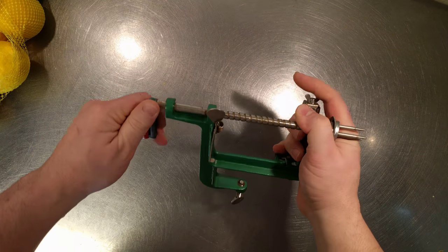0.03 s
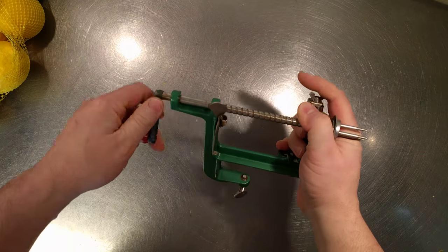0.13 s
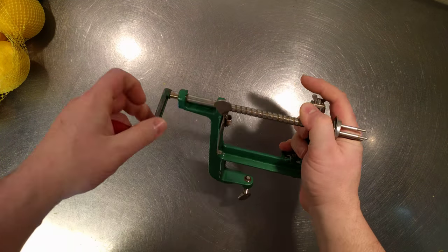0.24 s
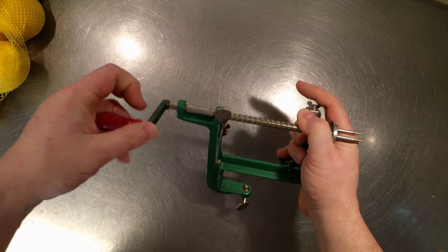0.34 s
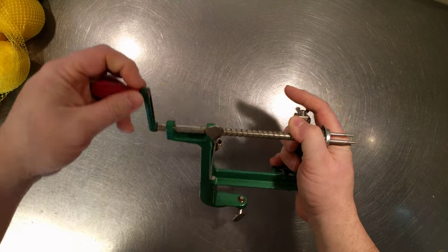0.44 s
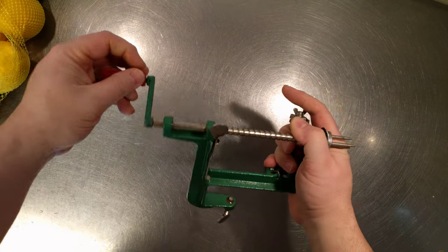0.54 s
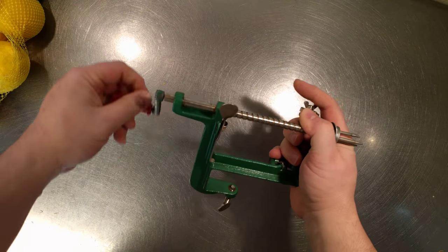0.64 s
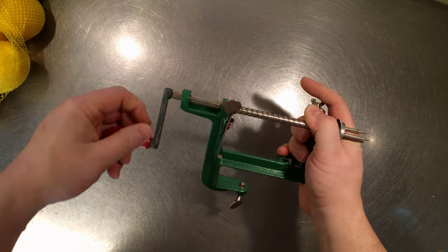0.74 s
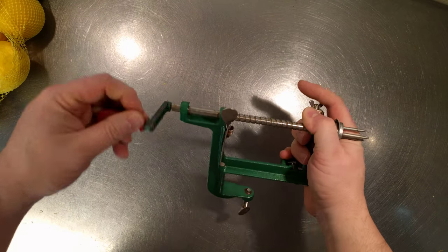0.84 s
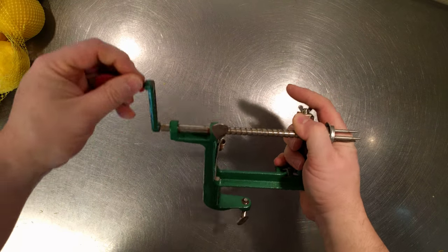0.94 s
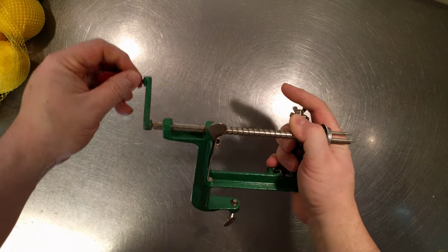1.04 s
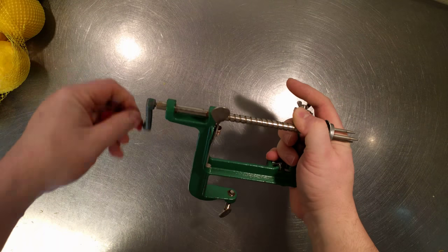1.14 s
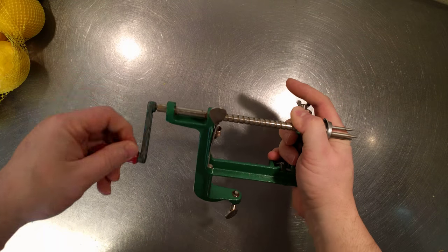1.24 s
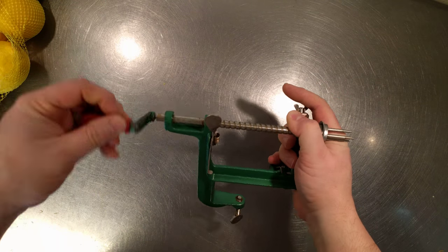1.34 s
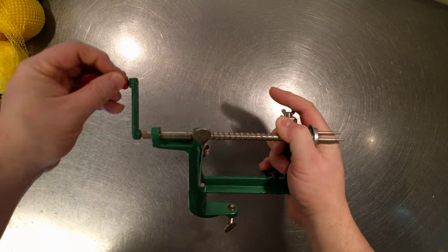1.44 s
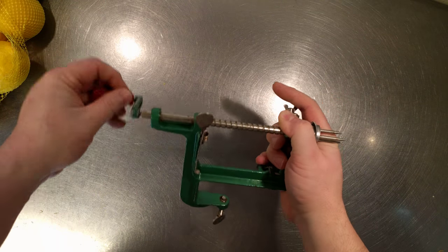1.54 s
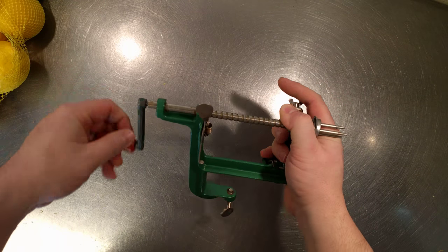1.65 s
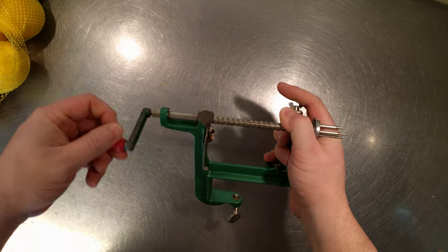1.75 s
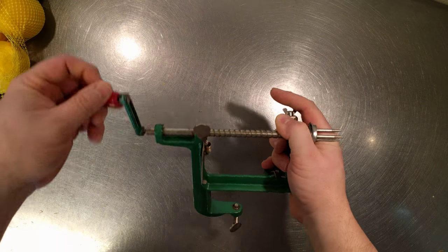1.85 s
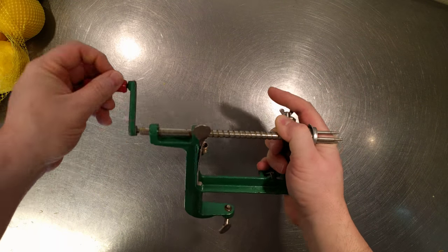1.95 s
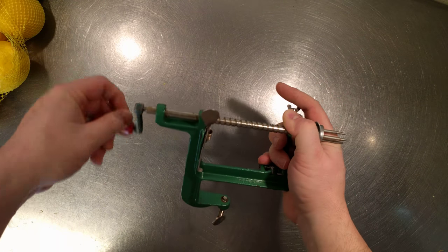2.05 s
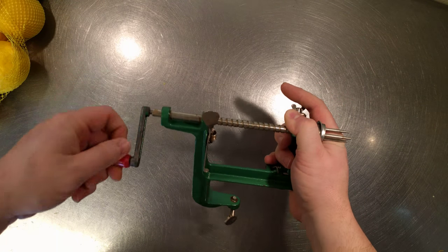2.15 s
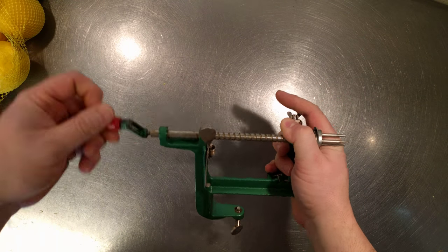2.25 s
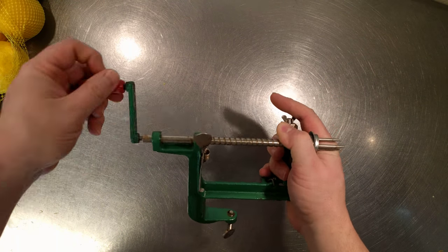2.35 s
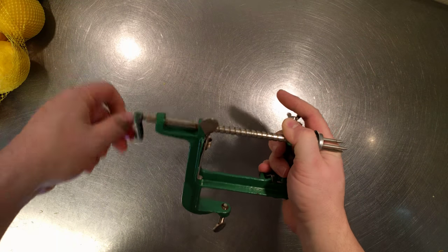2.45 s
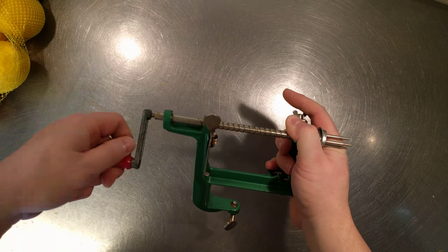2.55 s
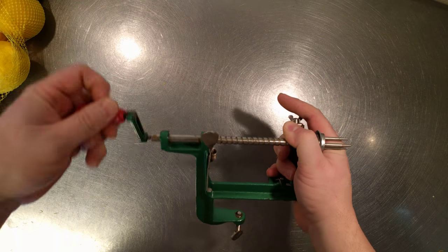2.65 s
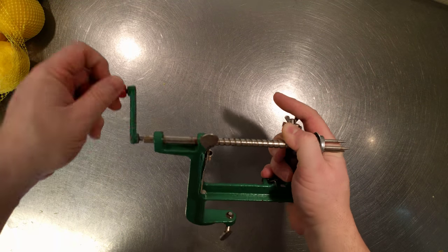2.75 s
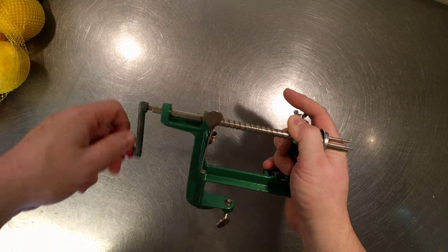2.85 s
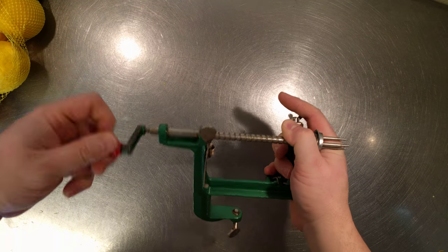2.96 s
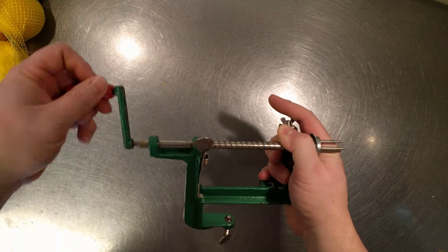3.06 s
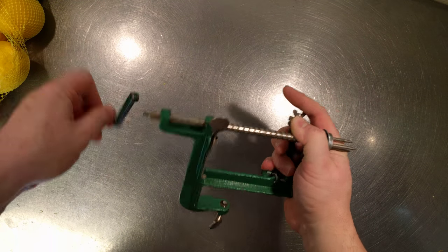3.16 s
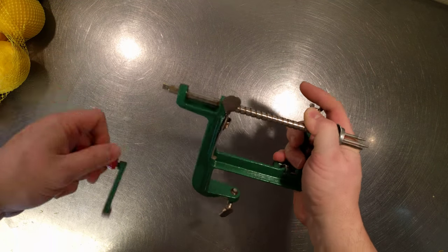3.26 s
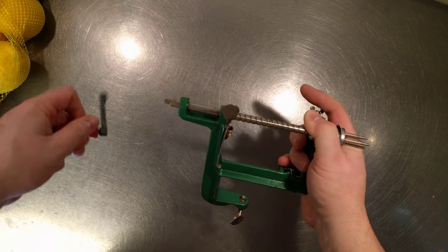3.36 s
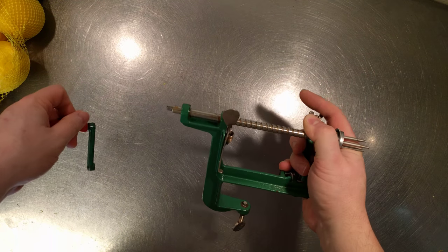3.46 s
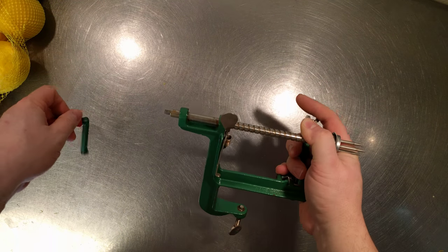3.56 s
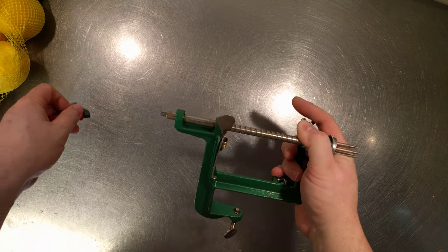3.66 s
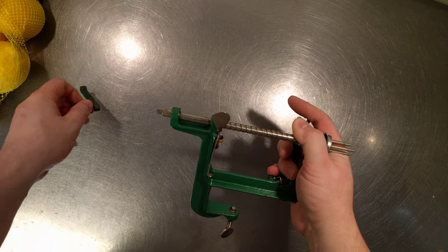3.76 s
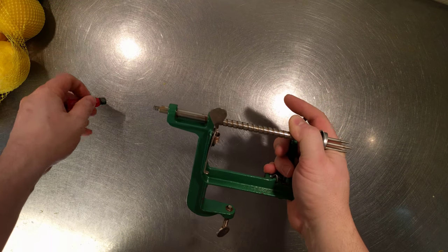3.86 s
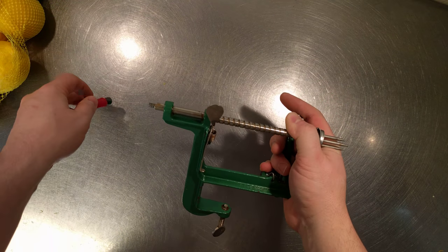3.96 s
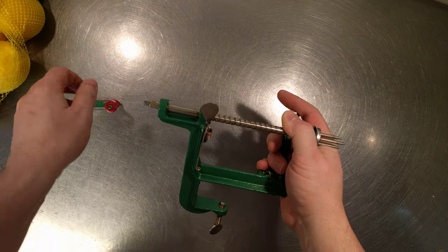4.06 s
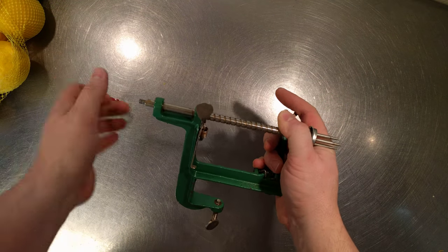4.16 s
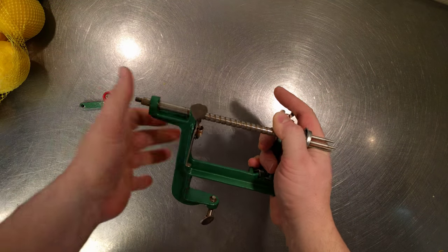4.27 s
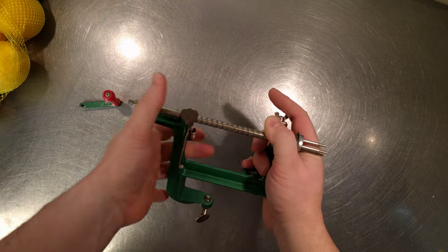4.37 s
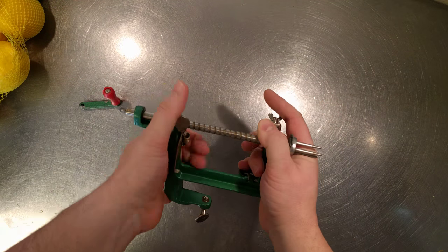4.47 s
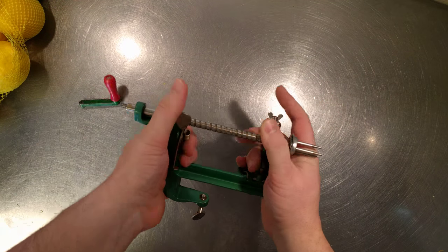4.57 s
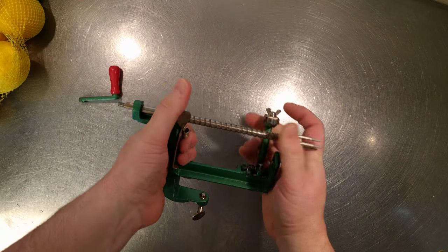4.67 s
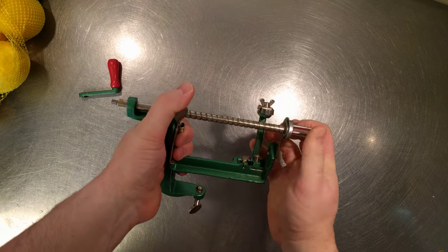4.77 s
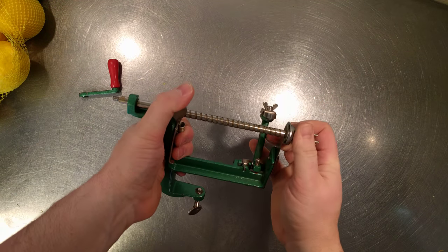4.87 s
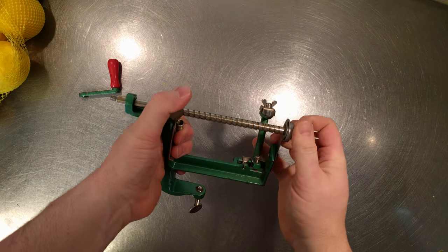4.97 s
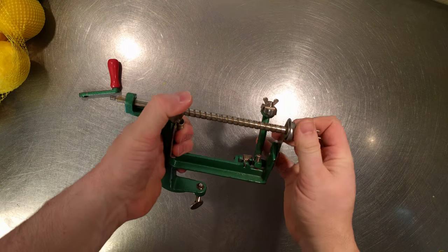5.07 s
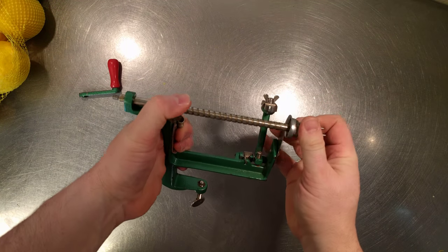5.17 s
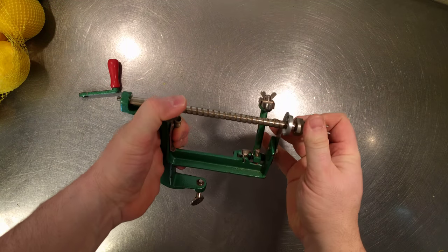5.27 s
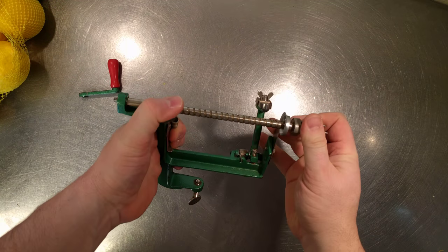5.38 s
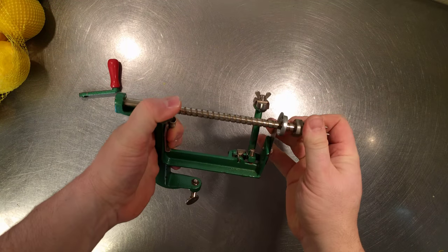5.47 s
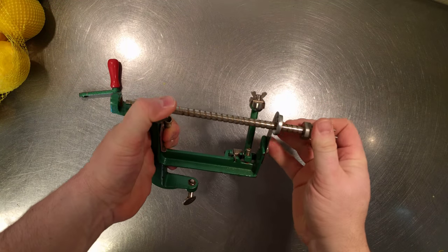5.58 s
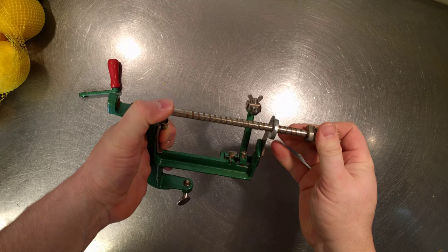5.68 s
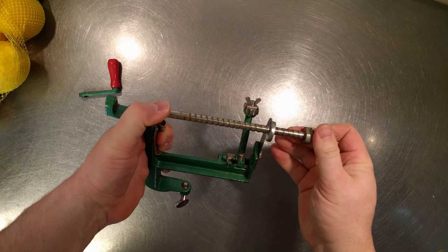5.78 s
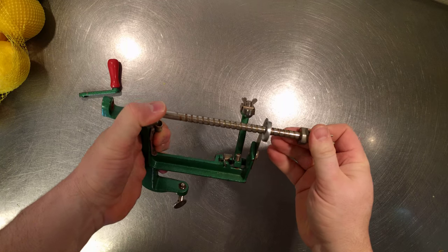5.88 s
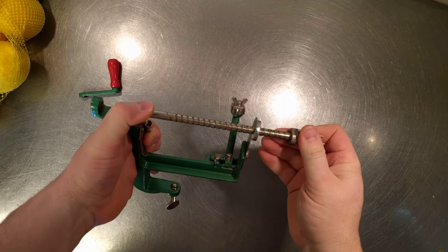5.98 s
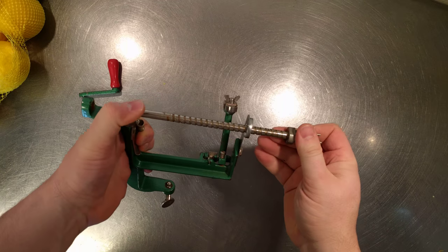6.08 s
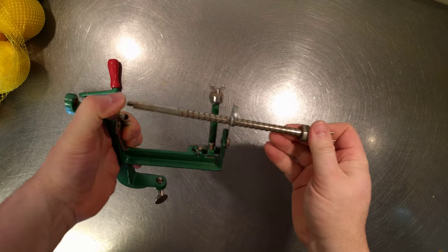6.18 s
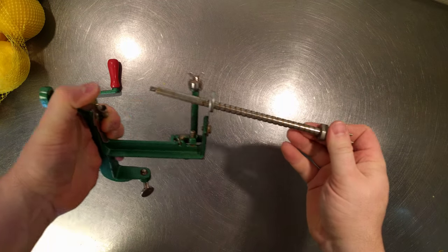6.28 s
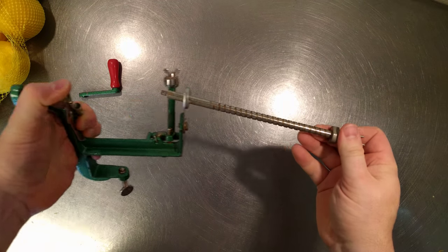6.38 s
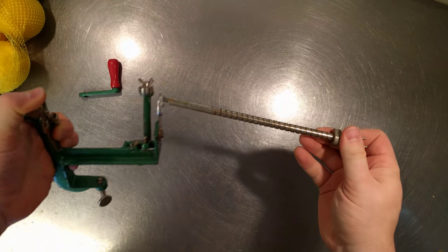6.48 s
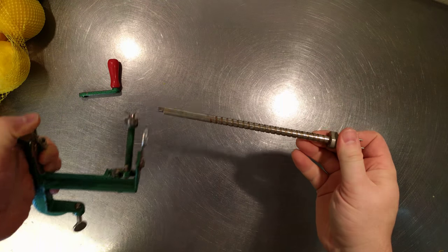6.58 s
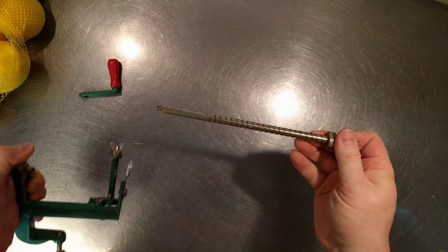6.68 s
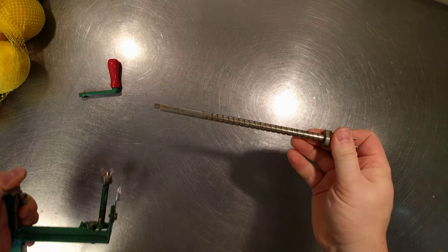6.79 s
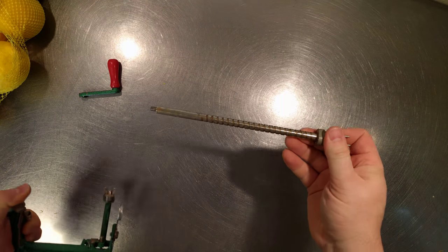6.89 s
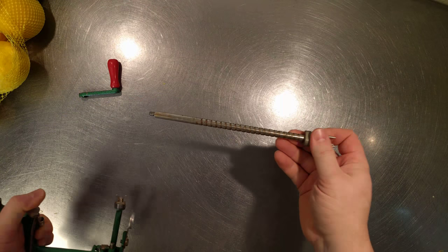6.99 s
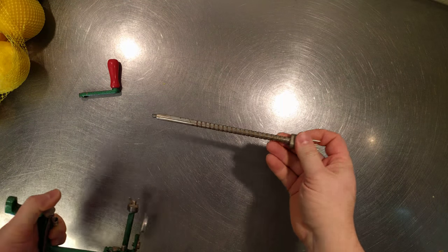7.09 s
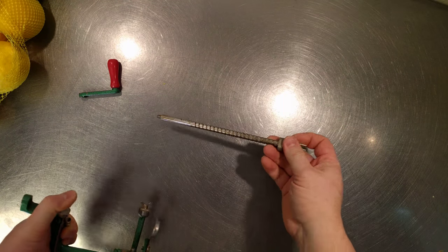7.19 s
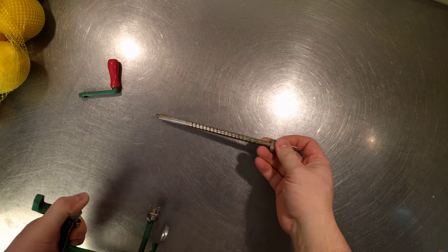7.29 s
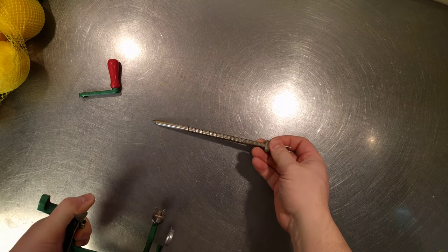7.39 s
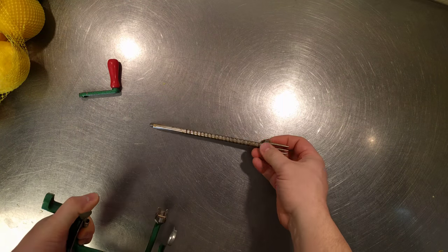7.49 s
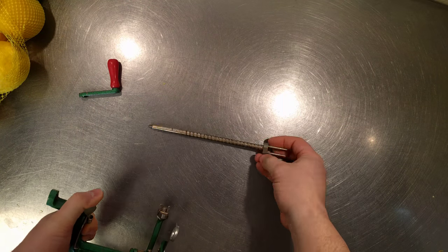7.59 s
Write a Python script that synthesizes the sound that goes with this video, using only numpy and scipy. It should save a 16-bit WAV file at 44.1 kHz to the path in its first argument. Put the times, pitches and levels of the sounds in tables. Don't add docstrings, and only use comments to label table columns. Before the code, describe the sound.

Over a steady low refrigerator hum with fan noise, an iron crank turns with irregular dry ticks and faint thread rubbing. It slides off and clanks onto a steel counter, the frame knocks down, then a threaded rod squeaks and chinks through a metal loop and is set down with a loud knock. Close microphone, kitchen echo, hardest hits slightly overloaded.

```python
import sys
import numpy as np
from scipy import signal
from scipy.fft import rfft, irfft, next_fast_len
from scipy.io import wavfile
from scipy.ndimage import uniform_filter1d

SR = 44100
rng = np.random.default_rng(int(sys.argv[2]) if len(sys.argv) > 2 else 0)


def volts(x):
    e = np.asarray(x, float) / 20
    return 10 ** e


def materialize(psi):
    bounded = np.clip(np.atleast_2d(psi).T, -1, 1)
    quanta = np.round(bounded * 32767).astype(np.int16)
    wavfile.write(sys.argv[1], SR, quanta)


N = 337365


def at_hz(points, hz):
    corner_hz, values = np.array(points)[:, :2].T
    return np.interp(np.log(hz), np.log(corner_hz), values)


def rms_one(x):
    return x / np.sqrt(np.mean(x ** 2) + 1e-20)


def colour(x, spectrum):
    size = next_fast_len(len(x), True)
    hz = np.maximum(np.arange(size // 2 + 1) * SR / size, 1)
    shaped = irfft(rfft(x, size) * volts(at_hz(spectrum, hz)), size)
    return rms_one(shaped[:len(x)])


def wobble(seconds):
    size = round(seconds * SR)
    smooth = uniform_filter1d(rng.standard_normal(N), size)
    return rms_one(uniform_filter1d(smooth, size))


def stroke(s, hold, db, attack, release):
    corners_s = np.cumsum([s - attack, attack, hold, release])
    corners_db = db - np.array([25, 0, 0, 25])
    return volts(np.interp(np.arange(N) / SR, corners_s, corners_db, -150, -150))


def add(out, s, x):
    i = round(s * SR)
    out[i:i + len(x)] += x[:N - i]


def ring(clicks, hz, t60):
    r = volts(-60 / (t60 * SR))
    w = 2 * np.pi * hz / SR
    return signal.lfilter([0, np.sin(w)], [1, -2 * r * np.cos(w), r * r], clicks + 1e-18)


def cluster(force, hz, t60):
    spread = 0.008
    detunings = rng.uniform(-1, 1, 3)
    return sum(ring(force, hz * (1 + spread * d), t60) for d in detunings) / np.sqrt(3)


def contact(seconds, swell=0.0):
    t = np.arange(2000) / SR
    sparse = rng.standard_normal(len(t)) * (rng.random(len(t)) < 0.25)
    chatter = sparse * np.exp(-np.maximum(t - swell, 0) / seconds)
    chatter *= np.sqrt(np.minimum((t + 1e-6) / (swell + 1e-6), 1))
    chatter[0] = 2.8 if swell == 0 else 0.5
    return chatter / np.sqrt(np.sum(chatter ** 2))


def crack(force, edges, levels_db, tail_db, t60):
    t = np.arange(len(force)) / SR
    burst = force + volts(tail_db - 60 * t / t60) * rng.standard_normal(len(t))
    out = 0
    for k, (low, high) in enumerate(zip(edges, edges[1:])):
        band = signal.sosfilt(signal.butter(2, [low, high], "band", fs=SR, output="sos"), burst)
        gain = volts(levels_db[k]) * np.sqrt(SR / 2 / (high - low))
        out = out + gain * (-1) ** k * band
    return out


def sheet_modes(size, blur_db):
    spacing_hz = 36
    lines = (rng.random(size // 2 + 1) < SR / size / spacing_hz) + volts(blur_db)
    chance = rfft(rng.standard_normal(size))
    return irfft(chance / np.sqrt(np.abs(chance)) * lines, size)


# frequency_hz, t60_s
SHEET_T60 = [(100, 0.19), (500, 0.34), (2000, 0.15), (6000, 0.062), (16000, 0.082)]
# frequency_hz, t60_s
KITCHEN_T60 = [(100, 1), (500, 0.64), (2000, 0.55), (6000, 0.41), (16000, 0.18)]


def dying(spectrum, stretch, echo_db, blur_db=-15):
    t = np.arange(SR // 2) / SR
    edges = 70 * 2 ** np.arange(0, 8.3, 0.5)
    noises = [colour(sheet_modes(len(t), blur_db), spectrum) for _ in range(2)]
    out = 0
    for k, (low, high) in enumerate(zip(edges, edges[1:])):
        band = signal.sosfilt(signal.butter(2, [low, high], "band", fs=SR, output="sos"), noises[k % 2])
        middle_hz = np.sqrt(low * high)
        sheet = volts(-60 * t / (stretch * at_hz(SHEET_T60, middle_hz)))
        kitchen = volts(echo_db - 60 * t / at_hz(KITCHEN_T60, middle_hz))
        out = out + band * (sheet + kitchen)
    return out


# pitch_hz, level_db (rms), beat_s (when neighbours beat loudest)
MOTOR_TONES = [(44.05, -54, .22), (49.08, -48, .22), (58.02, -55, .22), (89.69, -46, 0), (120.03, -39, .14),
               (122.33, -49, .14), (144.5, -63, 0), (178.1, -65, 0), (269.1, -64, 0), (290.1, -66, 0),
               (348.1, -67, 0), (359.4, -62, 0), (658, -55, 0)]
# pitch_hz, width_hz, level_db
FAN_CASING = [(267.5, 22, -3), (348.4, 19, 2), (416, 22, -15), (575, 20, -10), (634, 14.9, 0.5),
              (655.6, 25, 1.5), (684, 15, -11.5), (784, 24.9, -8.5), (793, 13, -4.5)]
# frequency_hz, level_db (per Hz)
AIR_COLOUR = [(30, -25), (45, -14), (120, -5.5), (165, -10.5), (250, -24), (350, -17), (480, -17.5),
              (640, -18), (800, -19), (1500, -20), (3000, -26.5), (6000, -35), (10000, -36), (17500, -37)]


def motors():
    whirr_db, air_db = -61, -45.5
    t = np.arange(N) / SR
    tones = sum(np.sqrt(2) * volts(db) * np.cos(2 * np.pi * hz * (t - s)) for hz, db, s in MOTOR_TONES)
    white = rng.standard_normal(N)
    whirr = sum(volts(whirr_db + db) * rms_one(ring(white, hz, 4.4 / width))
                for hz, width, db in FAN_CASING)
    return tones + whirr + volts(air_db) * colour(rng.standard_normal(N), AIR_COLOUR)


# start_s, hold_s, level_db, attack_s, release_s
THREAD_RUBS = [
    (0.32, 2.9, -56, 0.3, 0.36),
    (6.118, 0.42, -53, 0.11, 0.23),
    (5.05, .62, -56.5, 0.11, .1),
    (3.8, .05, -51, .05, .05),
]
# frequency_hz, level_db (per Hz)
THREAD_COLOURS = [
    [(1500, -16), (3000, -3), (6000, -5), (9000, -7), (17500, -9)],
    [(1200, -12), (2300, -4), (4500, -3), (6500, -10), (11000, 1.5), (13500, -8), (17500, -14.5)],
    [(1200, -10), (2500, 0), (5000, -3), (7500, -9), (17500, -22)],
    [(1500, -12), (4200, 0), (6200, -3), (9000, -8), (17500, -20)],
]


def thread_rubs():
    hand = volts(5.5 * wobble(0.1))
    return hand * sum(stroke(*row) * colour(rng.standard_normal(N), spectrum)
                      for row, spectrum in zip(THREAD_RUBS, THREAD_COLOURS))


# start_s, hold_s, level_db, attack_s, release_s
DRAG_STROKES = [
    (1.162, 0.019, -45, 0.014, 0.016),
    (1.204, 0.018, -37, 0.021, 0.11),
    (2.552, .004, -51, .03, 0.039),
    (2.66, 0.037, -50, 0.061, .025),
    (3.968, 0.13, -37.5, 0.0014, 0.0065),
    (5.239, 0.045, -50, 0.037, 0.16),
    (6.064, 0.0028, -48.5, 0.032, 0.022),
    (6.166, 0.021, -56, .06, 0.035),
    (4.041, 0.042, -41, 0.073, .04),
]
# frequency_hz, level_db (per Hz)
DRAG_COLOURS = [
    [(200, -19), (1200, -1.5), (2500, -8.5), (5000, -20)],
    [(120, -46), (200, -6), (645, -3.5), (1130, -3.5), (1260, 0), (2000, -5.5), (3700, -18.5),
     (12900, -14.5), (17000, -24)],
    [(880, -33), (1500, -4), (3180, -0.5), (3380, -3), (5620, -3), (9240, -4), (17000, -18.5)],
    [(880, -24.5), (1500, -4.5), (3150, -12.5), (3740, -1.5), (5560, -13.5), (8100, -13), (17000, -21)],
    [(120, -25), (200, -19), (343, -4.5), (421, -15), (453, -15), (488, -13.5), (1260, -18.5), (2040, -6),
     (2410, -10), (2650, -8.5), (2850, -11.5), (9040, -25), (17000, -31.5)],
    [(1530, -20), (2600, 5.5), (3640, -7.5), (5270, -4), (8250, -4), (11700, -1.5), (17000, -14.5)],
    [(1530, -36), (2600, -7.5), (4800, -8), (6030, -2), (9000, -10.5), (9510, -8), (17000, -16.5)],
    [(1530, -33), (2600, -8.5), (3110, -18), (3790, 1.5), (6320, 0), (8190, -5), (17000, -22.5)],
    [(3000, -27), (5000, -3.5), (7000, -3.5), (9000, 0.5), (11500, -4.5), (17000, -19.5)],
]
# start_s, hold_s, pitch_hz, level_db, t60_s
SLIDE_RINGS = [(3.969, .01, 4260, -42, .03), (3.995, .055, 2080, -48, .02), (4.0, .05, 2580, -46, .025),
               (3.985, .07, 1600, -47, .03), (3.985, .03, 3100, -49, .02), (4.032, .012, 6630, -46.5, .03),
               (4.064, .018, 5120, -39, .05), (4.05, .04, 8830, -47.5, .02), (4.05, .035, 9280, -48, .038),
               (4.01, .02, 4200, -52, .02), (6.165, .035, 6250, -55, .04), (6.165, .03, 3900, -55, .03),
               (6.17, .025, 4900, -57, .03), (6.175, .03, 7350, -57, .03), (6.245, .16, 1010, -54, .25),
               (2.662, .035, 3700, -52, .04), (2.69, .012, 8600, -54, .03), (2.725, .025, 1150, -52, .06)]


def drags():
    clumps = volts(0.86 * wobble(0.0034))
    sizes = volts(1.8 * np.minimum(rng.exponential(1, N), 4))
    grains = rng.standard_normal(N) * sizes * clumps
    out = sum(volts(5.0) * stroke(*row) * colour(grains, spectrum)
              for row, spectrum in zip(DRAG_STROKES, DRAG_COLOURS))
    for s, hold, hz, db, t60 in SLIDE_RINGS:
        push = grains * stroke(s, hold, 0, 0.006, 0.013)
        level = volts(db) * np.sqrt(28 / (t60 * SR)) / np.std(grains)
        out = out + level * ring(push, hz, t60)
    return out


# start_s, hold_s, level_db
ARM_SLIPS = [(5.24, 0.015, -47), (5.269, 0.006, -38), (5.512, 0.045, -55), (5.579, 0.052, -45.5),
             (5.643, .008, -36), (5.662, .012, -41), (5.677, .008, -36), (6.06, 0.0042, -36),
             (6.164, .004, -37), (6.182, .002, -39), (6.203, .006, -45)]
# start_s, hold_s, level_db
SQUEAK = (5.155, .11, -53.5)


def singing():
    arm_hz, tremble_hz = 2296, 37
    catch_s, release_s, squeak_ramp_s = 0.0044, 0.022, 0.014
    squeak_hz, sag_hz, swell_db = 5280, 86, 5.5
    mode_hz = arm_hz + tremble_hz * wobble(0.0046)
    mode = volts(2.7 * wobble(0.0048)) * np.sin(2 * np.pi * np.cumsum(mode_hz) / SR)
    slips = mode * sum(stroke(*row, catch_s, release_s) for row in ARM_SLIPS)
    start_s, hold_s, _ = SQUEAK
    along = np.clip((np.arange(N) / SR - start_s) / hold_s, 0, 1)
    hz = squeak_hz - sag_hz * np.sin(np.pi * along) + tremble_hz * wobble(0.005)
    swell = volts(swell_db * (along - 0.5) + 2.6 * wobble(0.0048))
    squeak = stroke(*SQUEAK, squeak_ramp_s, squeak_ramp_s) * swell * np.sin(2 * np.pi * np.cumsum(hz) / SR)
    return np.sqrt(2) * (slips + squeak)


# start_s, peak_db, ring_hz, fall_db (per octave
# above the ring), ring_db
SLACK_KNOCKS = [(0.3147, -32.5, 2830, 10, -12), (0.446, -3.5, 7650, 18, -34), (0.7938, -26, 2360, 18, -6),
                (0.828, -35, 3100, 21, -5), (0.921, -33.5, 1800, 10, -7), (1.2504, -16.5, 4200, 31, -9),
                (1.302, -32, 2400, 12, -10), (1.4537, -19.5, 2560, 7, -21), (1.4546, -13.5, 9000, 30, -6),
                (1.6935, -22.5, 5200, 4, -2), (1.734, -23.5, 2640, 4, -5.5), (2.0098, -26.5, 2400, 4.5, -20),
                (2.126, -36, 1520, 2, -4), (2.2394, -25.5, 2840, 5, -6), (2.261, -22, 2750, 5.5, -13),
                (2.336, -18, 2250, 4.5, -16), (2.5668, -31, 1770, 9, -6), (2.6613, -35, 3740, 9, -11),
                (2.7147, -28.5, 2500, 16, -13), (2.922, -16, 2540, 7.5, -8.5), (3.131, -35, 1600, 1.5, 7),
                (3.1417, -31.5, 5200, 13, -4), (3.2061, -26.5, 2600, 9, -7), (5.058, -25, 2470, 3, -17),
                (5.06, -25, 12600, 6, -13)]
# start_s, pitch_hz, level_db
SIDE_RINGS = [(0.446, 3950, -18), (0.446, 5600, -19), (0.446, 6790, -31), (0.446, 9000, -23),
              (0.446, 10100, -37), (0.446, 13600, -30), (2.261, 2400, -39), (2.261, 5000, -27),
              (2.3357, 2690, -26), (2.3357, 1620, -49), (2.3357, 4150, -31), (2.3357, 4590, -39),
              (2.922, 1690, -35), (2.922, 3760, -39), (2.922, 5200, -26), (3.131, 4750, -36),
              (3.2061, 3550, -37), (3.2061, 5250, -44), (2.2396, 3800, -41), (2.2396, 4900, -36),
              (5.2715, 5000, -50), (5.677, 5500, -34)]


def ticks():
    ring_cycles = 55
    rise_db, bend = 9, 1.8
    top_hz, top_loss_db = 11000, 6
    out = np.zeros(N)
    edges = 1400 * 2 ** np.arange(0, 3.7, 0.6)
    centres = np.sqrt(edges[1:] * edges[:-1])
    for s, peak_db, hz, fall_db, ring_db in SLACK_KNOCKS:
        force = np.pad(contact(0.0002), (0, 3000))
        octaves = np.log2(centres / hz)
        levels_db = np.where(octaves > 0, -fall_db * abs(octaves) ** bend, rise_db * octaves)
        levels_db = levels_db - top_loss_db * octaves * (centres > top_hz)
        click = volts(1.0) * crack(force, edges, levels_db, tail_db=-19, t60=0.044)
        spot = ring(force, hz, ring_cycles / hz)
        add(out, s, volts(peak_db) * (click + volts(ring_db) * spot / np.max(spot)))
    click = np.eye(1, 3000)[0]
    for s, hz, db in SIDE_RINGS:
        add(out, s, volts(db) * ring(click, hz, ring_cycles / hz))
    return out


# start_s, peak_db, arm_db, bright_db, contact_s
CHINKS = [
    (5.271, -28, -7, -29, 0.0018),
    (5.677, -33, -5.5, -19, 0.0021),
    (6.0594, -41, -14.5, -24, 0.0037),
    (6.229, -17.5, -8, -3.5, 0.0014),
    (6.338, -21, -11.5, -6.5, 0.003),
    (6.3519, -22, -7.5, -11, 0.0034),
    (6.3724, -18, -6, -8.5, 0.0022),
    (6.4203, -21.5, -5.5, -8.5, 0.0043),
    (6.5312, -12, -7.5, -7.5, 0.0022),
]
# pitch_hz, level_db, t60_s
LOOP_MODES = [(1840, -15, 0.1), (1980, -9.5, 0.1), (2277, 1.5, 0.042), (3400, -16, 0.072), (3890, -12, .04),
              (4350, -9, 0.053), (4700, -16, 0.033), (7330, -5.5, 0.057), (7900, -9.5, 0.04),
              (8800, 2.5, 0.029), (10900, -6, 0.05), (14000, -17, 0.04), (12700, -12, 0.04),
              (15300, -15, 0.03)]
# pitch_hz, level_db, t60_s
SNAG_MODES = [(1020, -11, .4), (2200, 1, 0.1), (3430, -5.5, 0.12), (4888, -9, 0.08), (6600, -15, 0.06),
              (7833, -3.5, .04), (8950, -19, 0.053), (9588, -22, 0.06), (10700, -4.5, 0.038),
              (11000, -12, 0.062), (13510, -9, 0.07), (13950, -14, 0.07), (15050, -5.5, 0.07),
              (15650, -16, 0.07)]
# pitch_hz, level_db, t60_s
ROD_END_MODES = [(1390, -21, 0.14), (2330, 5.5, 0.041), (3870, -16, 0.1), (4800, -21, 0.1),
                 (5530, -12, 0.09), (6270, -1.5, 0.05), (7800, -15, 0.08), (8737, -4, 0.066),
                 (9297, -16, 0.05), (10860, -10, 0.095), (12700, -15, 0.069), (13900, -7, 0.06),
                 (15510, -11, 0.084), (15950, -17, 0.09)]


def chinks():
    middle_db, graze_swell_s, longest_s = -3.5, 0.0016, 0.072
    out = np.zeros(N)
    edges = [1500, 3500, 7000, 17000]
    thin = signal.butter(4, 1500, "high", fs=SR, output="sos")
    special = {CHINKS[3][0]: SNAG_MODES, CHINKS[-1][0]: ROD_END_MODES}
    for s, peak_db, arm_db, bright_db, seconds in CHINKS:
        body = special.get(s, LOOP_MODES)
        levels_db = [arm_db, middle_db, bright_db]
        tone = list(zip([2300, 5000, 11000], levels_db))
        force = np.pad(contact(seconds, graze_swell_s), (0, 5000))
        rings = 0
        for hz, db, t60 in body:
            mode = cluster(force, hz, min(t60, longest_s * 2300 / min(hz, 2300)))
            mode_db = db + at_hz(tone, hz) + rng.normal(0, 2)
            rings = rings + volts(mode_db) * mode / np.max(mode)
        click = volts(2.0) * crack(force, edges, levels_db, tail_db=-19, t60=0.11)
        add(out, s, volts(peak_db) * signal.sosfilt(thin, rings + click))
    return out


# start_s, level_db, rattle_s, part
BLOWS = [
    (3.967, -27, 0.0036, "tip"),
    (4.107, -3.5, 0.012, "crank"),
    (4.117, -6.5, 0.0068, "flat"),
    (4.206, -21, 0.0091, "knob"),
    (4.2112, -21.5, 0.0068, "knob"),
    (4.6919, -19.5, 0.02, "touch"),
    (4.701, -7, 0.0062, "frame"),
    (4.706, -12, 0.008, "foot"),
    (7.43, -4, 0.0017, "rod"),
]
PART_ROW = {"tip": 5, "crank": 0, "touch": 1, "rod": 2, "knob": 3, "frame": 4, "flat": 6, "foot": 7}
# frequency_hz, level_db (per Hz)
PART_COLOURS = [
    [(59, -34), (100, -5.5), (232, -14.5), (600, -6), (900, -7), (1400, -4), (2400, -3.5), (3300, -6.5),
     (5300, -2), (6500, -3), (9300, 5), (13000, -0.5), (17500, 2)],
    [(59, -47), (100, -21.5), (517, -25), (988, -27), (2560, -12), (3400, -16.5), (5110, -17.5),
     (7220, -12.5), (9150, -10.5), (12100, -24.5), (17500, -29.5)],
    [(47, -40), (80, 1), (134, -2), (211, -4.5), (388, -5.5), (729, -13.5), (1190, -5), (2000, -10),
     (3200, -9), (4420, -9), (5800, -7.5), (7200, -7), (8900, -3.5), (16000, -7), (17500, 0.5)],
    [(180, -16.5), (400, -5.5), (1270, -13.5), (2600, -7), (3600, -2), (5200, -12), (6800, -7), (9300, 1.5),
     (17500, -11)],
    [(220, -14.5), (550, -14.5), (1100, -18), (2200, -7), (2900, -6.5), (3550, -17), (4300, -4), (5300, -5),
     (6000, -15.5), (7200, 0), (8300, -15.5), (9300, -5.5), (10800, -9.5), (12300, -11), (17500, -17.5)],
    [(100, -14), (400, 2), (1300, -2.5), (2500, -9.5), (4200, -5), (7000, -6.5), (11000, -10.5),
     (17500, -24)],
    [(200, -11.5), (700, -7), (1100, -4.5), (1600, 1), (2300, 0), (3300, -4.5), (5200, -1.5), (9000, -2.5),
     (17500, -6)],
    [(400, -18), (1500, -16), (2600, -4.5), (3600, -5.5), (5000, 0), (7300, -1), (9500, -2), (12500, -7.5),
     (17500, -7.5)],
]
SEATING = {"tip": (0.95, -18, .0003), "crank": (0.94, -6.5, .0004), "knob": (0.6, -4, 0.002),
           "touch": (0.56, -6, 0.0015), "frame": (1, -7, 0.00099), "rod": (0.62, -5, 0.000404),
           "flat": (0.5, -9, 0.0026), "foot": (0.6, -12, 0.0013)}
LANDING_LINES = {0: [(763, -9, .17), (1314, -5, .15), (1560, -7, .25), (2390, -8, .3), (2787, -9, .16),
                 (5200, -2, 0.13), (6400, -13, .3), (6940, -2, 0.05), (7550, -12, .35), (8958, -11.5, .3),
                 (9310, -6, .25), (10100, -11.5, .3), (10900, -9.5, .3), (13470, -13, .2)],
                 2: [(319, -4, .4), (408, -11.5, .4), (1198, -4.5, .45), (1480, -5, .3), (2400, -2, 0.22),
                 (3270, -12, 0.13), (3390, -10, .3), (4390, -12, .3), (5500, 2, 0.23), (5890, 3.5, .15),
                 (7620, -11, .28), (8100, 4, .12), (9250, -8, .1), (13800, -10.5, .14)],
                 3: [(3500, -9, .12), (5160, 3, .2), (9400, -4, .1)], 4: [(2074, -4, 0.3), (2340, -8, 0.3),
                 (3110, -7, 0.5), (4150, -6, .5), (4380, -3, 0.5), (4700, -3, .5), (5050, -5, 0.5),
                 (5370, -4, .45), (7200, -6, 0.4), (7620, -9, 0.4), (9055, -3, 0.4), (9500, -5.5, 0.4),
                 (11800, -16, 0.223), (13970, -11, 0.166)]}


def blows():
    longest_ring_s = 0.4
    out = np.zeros(N)
    for s, db, seconds, name in BLOWS:
        row = PART_ROW[name]
        stretch, echo_db, onset_s = SEATING[name]
        body = dying(PART_COLOURS[row], stretch, echo_db)
        t = np.arange(len(body)) / SR
        shaking = np.exp(-(t / seconds) ** 4) * volts(rng.normal(0, 6.5, len(t)))
        rattle = 1 + volts(-3.5) * shaking
        force = np.pad(contact(0.0015), (0, len(t) - 2000))
        lines = sum(volts(line_db - 16.5) * cluster(force, hz, min(t60, longest_ring_s) * stretch)
                    for hz, line_db, t60 in LANDING_LINES.get(row, []))
        add(out, s, volts(db) * (np.minimum(t / onset_s, 1) * rattle * body + lines))
    return out


def scene():
    echo_db = -15
    background = motors()
    near = thread_rubs() + drags() + singing() + ticks() + chinks()
    echo = np.pad(dying([(100, -14), (17000, -9.5)], 0.93, 0, blur_db=20), (200, 0))
    wet = signal.fftconvolve(near, echo / np.sqrt(np.sum(echo ** 2)))[:N]
    return (near + volts(echo_db) * wet + blows() + background)[None]


def roll_off(x):
    return signal.sosfilt(signal.butter(12, 17690, fs=SR, output="sos"), x)


def record(dry):
    clipped = np.clip(dry, -0.93, 0.93)
    top = signal.cheby2(14, 60, 17800, fs=SR, output="sos")
    return roll_off(signal.sosfilt(top, clipped))


dry = scene()
out = record(dry)
materialize(out)
```